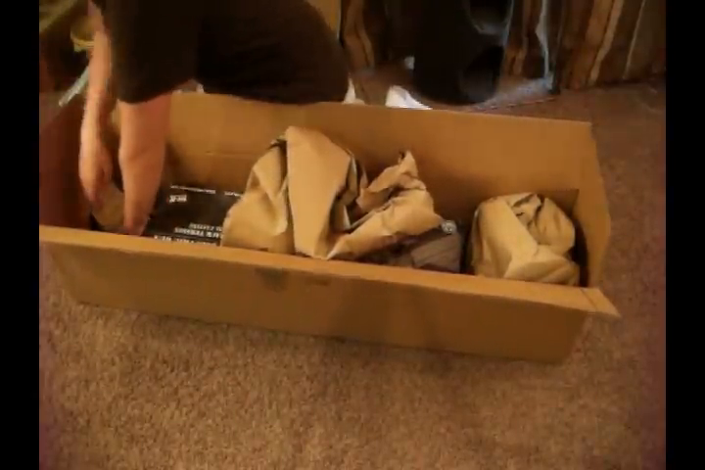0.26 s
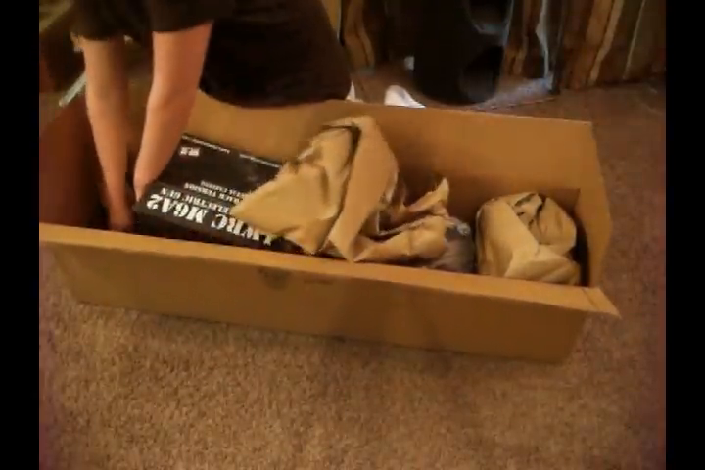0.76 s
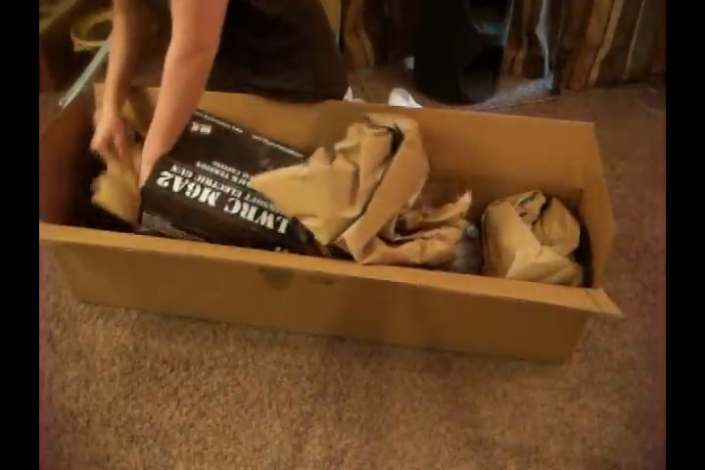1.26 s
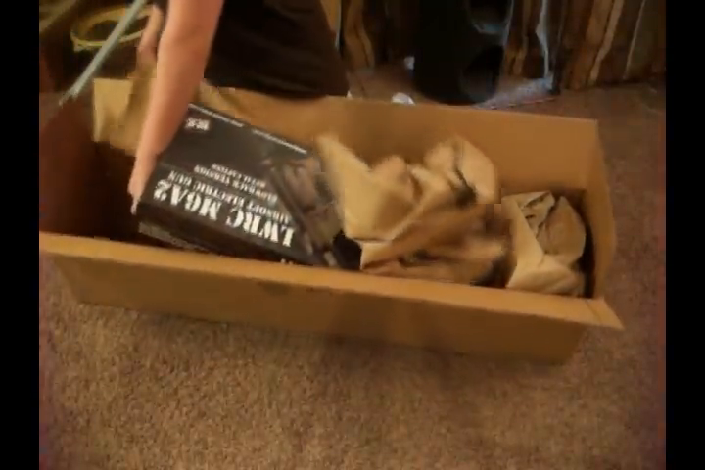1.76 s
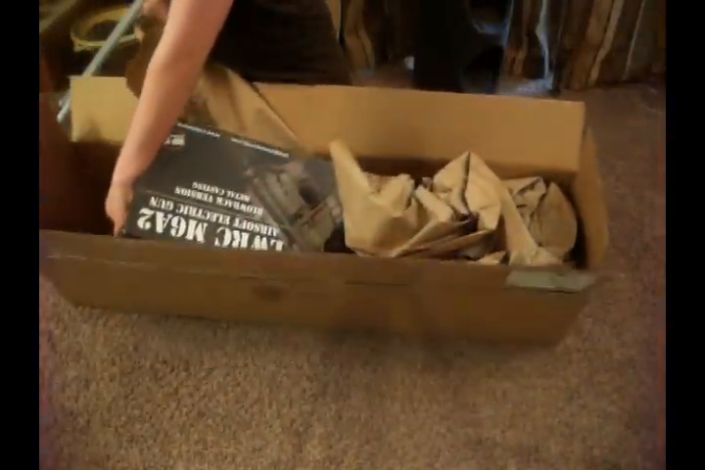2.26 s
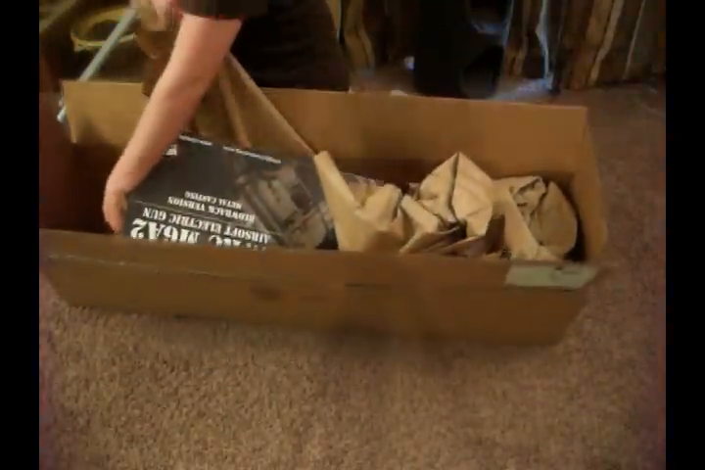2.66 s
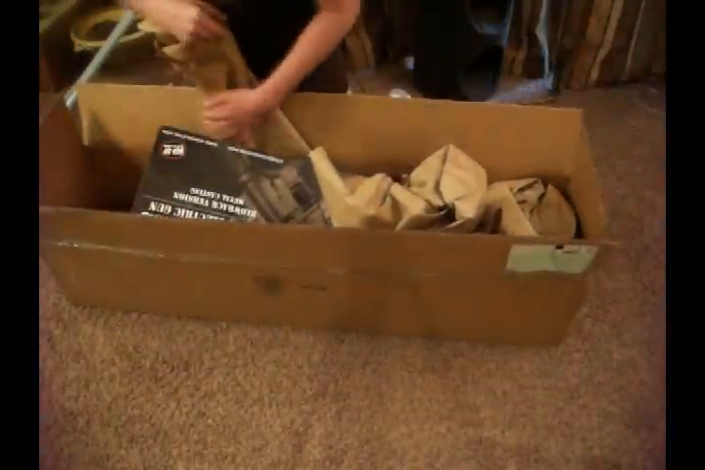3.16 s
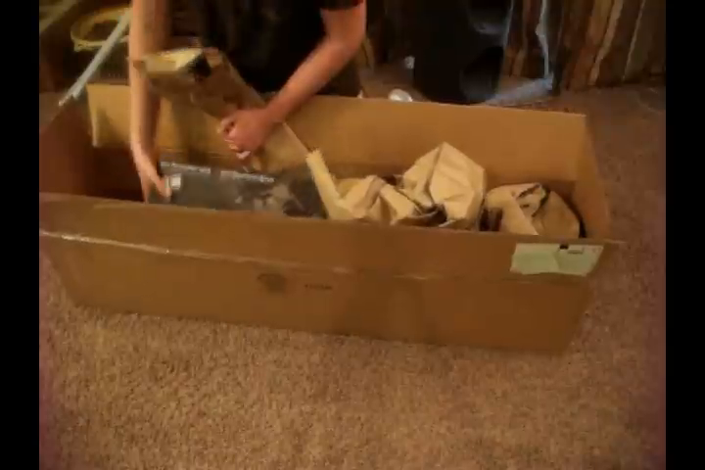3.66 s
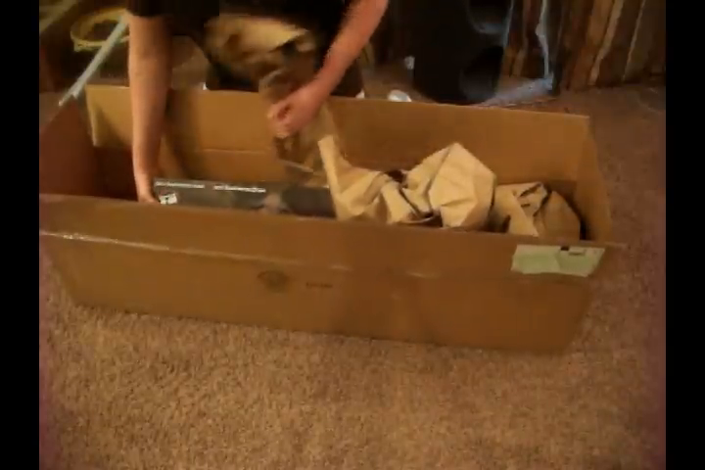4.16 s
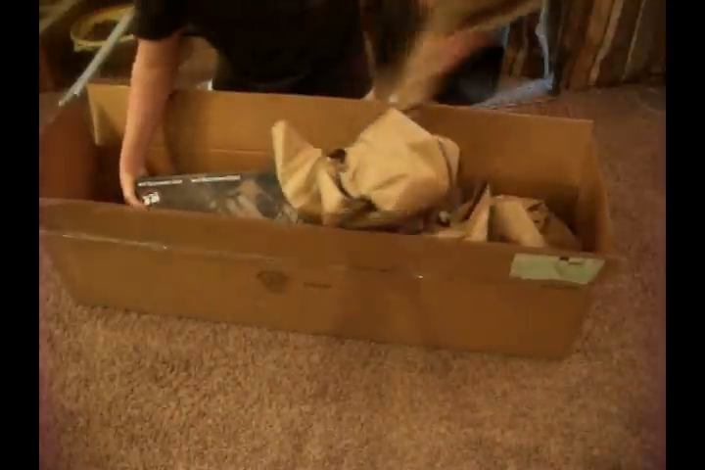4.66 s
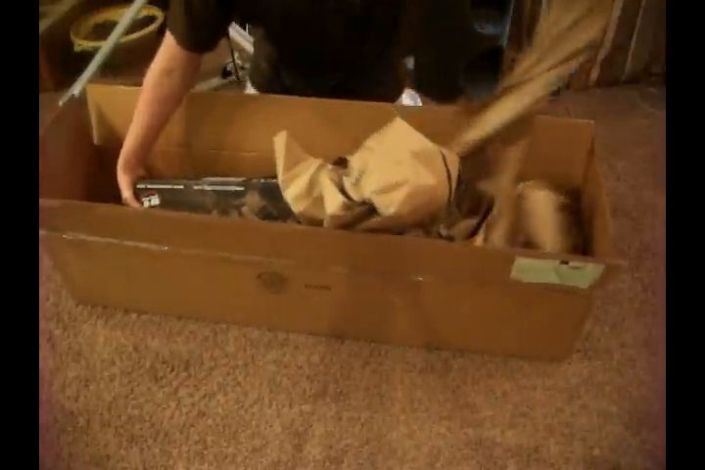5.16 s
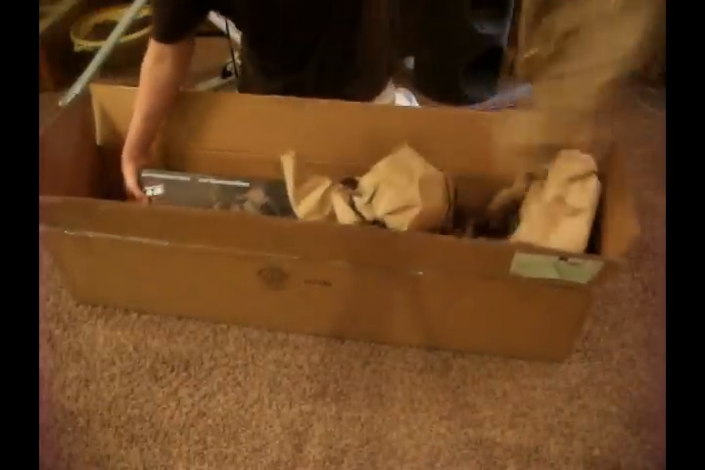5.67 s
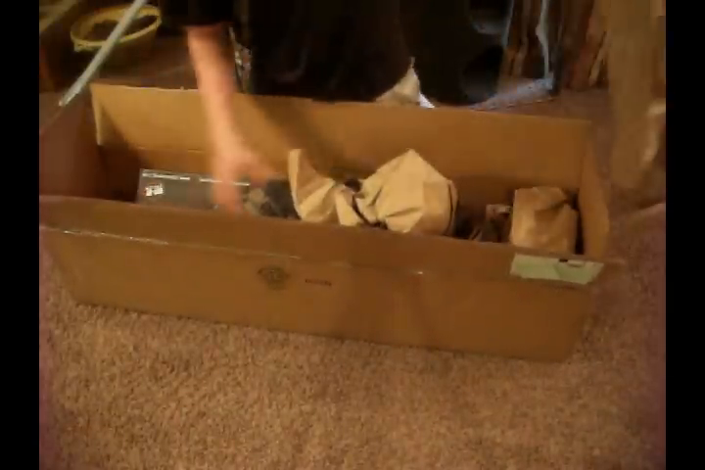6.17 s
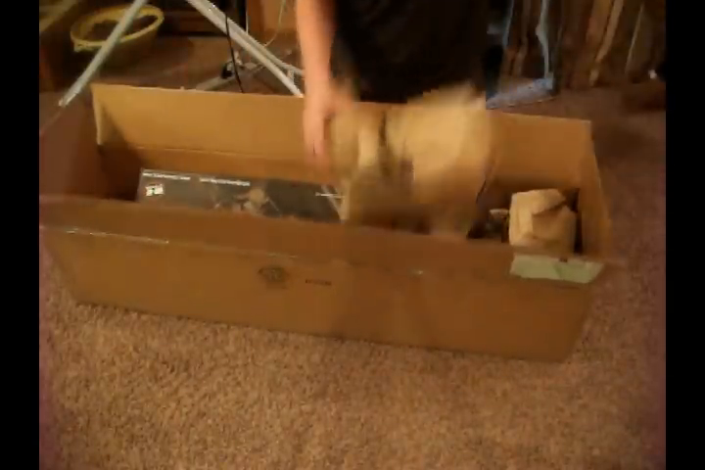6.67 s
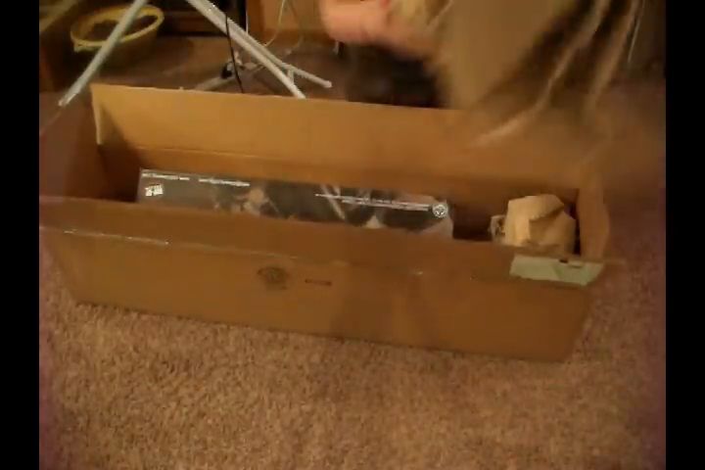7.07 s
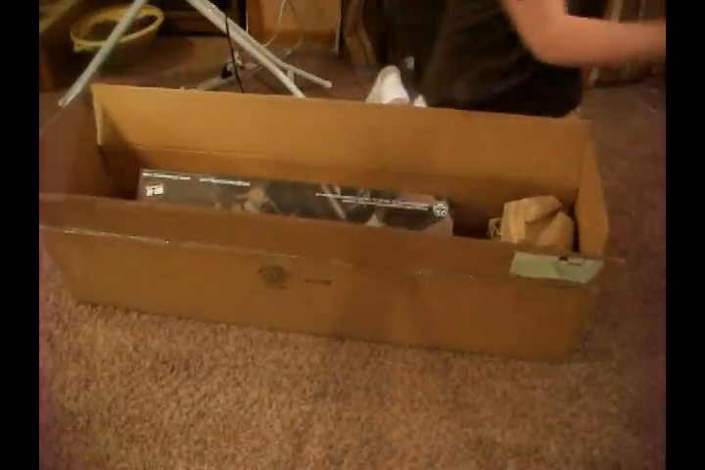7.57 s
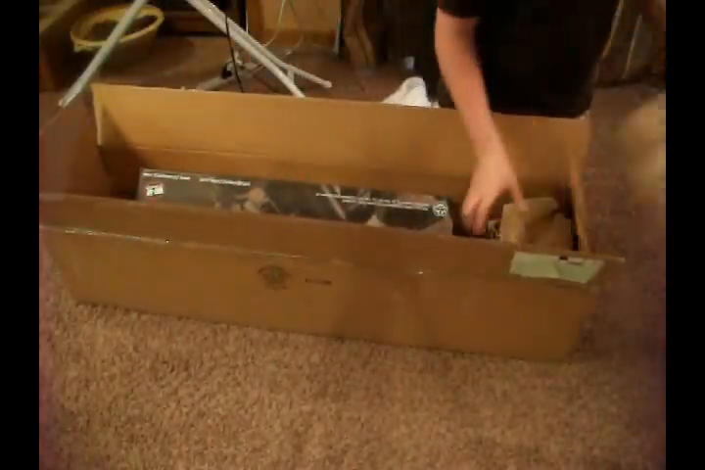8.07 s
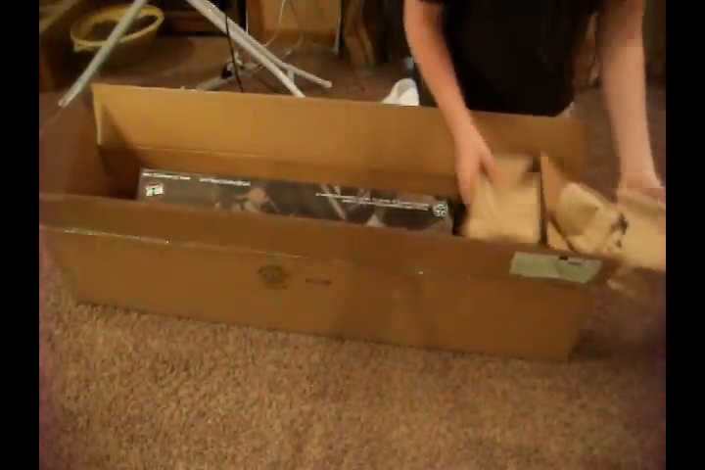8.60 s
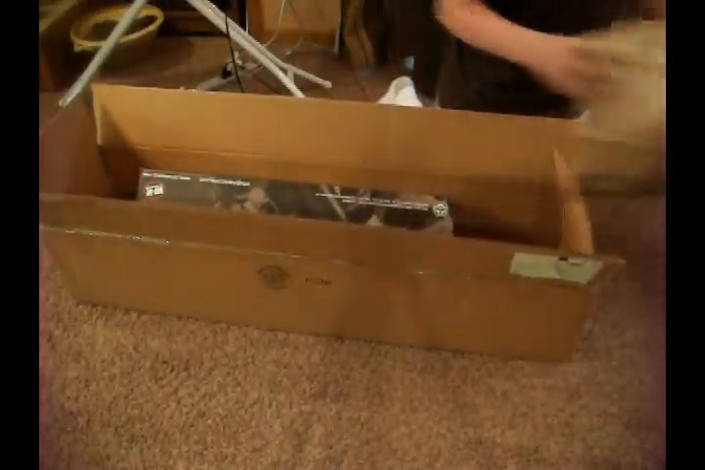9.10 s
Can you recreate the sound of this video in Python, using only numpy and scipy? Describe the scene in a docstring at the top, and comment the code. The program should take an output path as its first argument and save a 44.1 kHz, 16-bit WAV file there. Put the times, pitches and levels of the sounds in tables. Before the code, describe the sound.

A close microphone in a quiet carpeted room, with faint steady hiss and slightly dulled treble. From 0 to 1 s, light rustles and isolated crease snaps, with soft bumps on a cardboard carton. From 1 to 2.5 s the crumpled paper crinkles densely, big folds popping around 1.8 s. Smaller uneven tugs and dry snaps follow to 4 s, with hollow knocks near 3.5 and 3.8 s. From 4.2 to 6 s a long continuous crackling haul scrapes along the box, a cluster of dull thumps at about 5.7 s. A brief lull, then a second wad rustles and slides from 6.3 to 7.1 s, a fold popping at 7.3 s. After near quiet, a firm burst at 7.6 s, a carton bump and coarse crinkling at 8 s, then more snaps and pops until about 9.3 s.

```python
"""Packing paper dragged from a carton

Crumpled kraft packing paper is dragged out of a long cardboard box in a carpeted room, heard from close by.
Filtered noise makes the hiss of sliding sheets; short struck resonances make creases snap and big folds flap and pop.
Noise and knocks through resonant modes make the carton drone and bump; faint shaped noise is the still room.
The hand reaches in, works a sheet loose, hauls it along the box, lifts a second wad and takes out the last."""
import sys
import numpy as np
from scipy import signal
from scipy.fft import rfft, irfft, next_fast_len
from scipy.io import wavfile

SR = 44100
rng = np.random.default_rng(int(sys.argv[2]) if len(sys.argv) > 2 else 0)


def log_audio(samples):
    """Write samples as a 16-bit WAV file to the path given in sys.argv[1]."""
    # one column per channel
    frames = np.atleast_2d(samples).T
    # limit to full scale, then quantise
    limited = np.clip(frames, -1, 1)
    pcm = np.round(limited * 32767).astype(np.int16)
    wavfile.write(sys.argv[1], SR, pcm)


N = 411843
T = np.arange(N) / SR  # s

# Single creases that snap through. Each row: start in seconds, relative strength in dB,
# pitch of the ringing facet in Hz, length of the crease's run in seconds (0 = one dry tick).
CREASE_SNAPS = [(0.0694, -7.5, 4600, .003), (0.2682, -0.5, 3100, 0.000059), (0.2957, -.5, 4750, 0.00083),
                (.727, -2.5, 2500, 0.0096), (0.899, -6, 4400, .003), (0.943, -1.5, 2820, .006),
                (1.146, -4.5, 4200, .004), (1.162, 0, 2300, .003), (1.2256, 0, 3160, .003),
                (1.239, -2, 3600, .004), (1.3059, 2.5, 4170, .003), (1.351, 0.5, 2670, .005),
                (1.408, 0, 3300, 0.00024), (1.955, -6, 3600, 0), (1.972, -3, 3150, 0), (2.0705, 4, 3460, 0),
                (2.258, -3, 5300, 0), (2.2682, 0.5, 3300, 0.00084), (2.2989, -4, 4350, 0),
                (2.4891, -4, 3800, 0.0025), (2.5153, -5.5, 4500, .003), (2.682, -2, 2060, 0.0014),
                (2.7407, -2, 3620, 0.00037), (2.8164, -5, 3980, 0.0047), (2.9596, -0.5, 3620, .005),
                (3.0793, -5, 3220, .003), (3.1034, -2.5, 3970, .0015), (3.215, 2, 3320, 0.00041),
                (3.2707, -2.5, 3700, 0.0037), (3.3197, -2, 2330, 0), (3.3515, -3, 3100, 0.003),
                (3.3722, -1.5, 3900, .003), (3.389, -6, 2900, .003), (3.4295, 2.5, 4600, 0),
                (3.4662, 0, 2100, 0), (3.5343, -5, 2500, 0.0013), (3.546, -8, 2800, .002),
                (3.6222, 5, 3750, 0.00057), (3.6785, 1.5, 4400, 0), (3.7053, -11, 2420, .0004),
                (3.85, -3.5, 3170, .0033), (3.9668, 3, 4630, 0), (3.975, -1.5, 3650, 0.0031),
                (3.9966, 1.5, 3830, 0.0044), (4.0806, 2.5, 3700, 0.0012), (4.14, -7, 2200, .002),
                (4.241, -1.5, 3880, 0.00053), (4.2984, 5, 3880, 0), (4.379, 0, 4000, 0),
                (4.8357, 0, 2890, 0), (4.8977, 0.5, 3010, 0.002), (5.0618, 0, 3400, 0.00021),
                (5.4046, -2, 2800, 0.0045), (5.5637, 2.5, 4730, 0), (5.701, -9, 3800, 0.0037),
                (5.912, -1, 2230, 0.0086), (6.342, -15, 4440, .0034), (6.483, -2, 2920, 0.0098),
                (6.495, -9, 2600, 0.014), (6.506, -2, 2240, 0.00019), (6.5546, -5, 3490, .003),
                (6.606, -1.5, 2820, .004), (6.6475, -5, 3270, .006), (6.945, -7, 4160, 0.0017),
                (7.035, -10, 4600, 0.035), (7.2211, 5, 3850, 0.00021), (7.579, -17, 1500, 0.007),
                (7.695, 3, 2540, 0), (7.8354, 1.5, 3450, 0), (8.0275, -1.5, 2350, 0.01),
                (8.193, -2.5, 2500, 0.0034), (8.3, -2.5, 3960, 0.0027), (8.354, -3, 3000, .003),
                (8.4316, -1, 2820, 0.00043), (8.709, -2.5, 4000, .0032), (8.744, 1, 3700, 0),
                (8.804, -0.5, 3370, 0.0014), (8.8162, -1, 4300, .0005), (9.1018, 0, 4200, .004),
                (9.188, -4.5, 2260, .003), (9.2646, 2, 4600, 0.00016)]
# Tone of a snapping crease or popping fold. Each row: frequency in Hz, gain in dB.
SNAP_TONE = [(150, -16.5), (700, 0.5), (4500, -2.5), (5500, -5.5), (7000, -12.5), (8200, -35), (11000, -60)]

REST_HZ = 2660  # centre of the crinkle of slack paper
FULL_RUN_S = 0.0023  # a crease running this long has full after-snaps and shakes the sheet fully


def undb(db):
    """Decibels are logarithmic: return the amplitude gain."""
    return 10 ** (np.asarray(db) / 20)


def unit(x):
    """Normalise the mean power: scale to an rms of 1."""
    return x / np.sqrt(np.mean(x ** 2))


def curves(table):
    """Linear interpolation: each column after the first becomes a line through time."""
    s, *columns = np.transpose(table)
    return [np.interp(T, s, c) for c in columns]


def fade(t, t60):
    """Exponential decay of amplitude, 60 dB down at t60."""
    return np.exp(-np.log(1000) * t / t60)


def resonance(f, hz, width):
    """Complex response of one damped mode, 1 at its centre."""
    return 1j * f * width / (hz ** 2 - f ** 2 + 1j * f * width)


def colour(x, points, size=2048):
    """Minimum-phase filtering through (Hz, dB) points, its phase found by folding the cepstrum."""
    hz, db = np.transpose(points)
    f = np.maximum(np.fft.rfftfreq(size, 1 / SR), 1)
    log_gain = np.log(undb(np.interp(np.log(f), np.log(hz), db)))
    cepstrum = irfft(log_gain)
    cepstrum[1:size // 2] *= 2
    cepstrum[size // 2 + 1:] = 0
    response = irfft(np.exp(rfft(cepstrum)))
    return signal.oaconvolve(x, response)[:N]


def band(x, hz, kind, order=2):
    """Butterworth filtering: low-, high- or band-pass."""
    return signal.sosfilt(signal.butter(order, hz, kind, fs=SR, output="sos"), x)


def walk(rate):
    """Slow random fluctuation with a spread near 1: straight lines join chance values, rate per second."""
    knots = rng.standard_normal(4096)
    return 1.2 * np.interp(T * rate, np.arange(len(knots)), knots)


def place(times, sounds):
    """Superposition: add each row of sounds at its time."""
    at = (np.maximum(times, 0) * SR).astype(int)[:, None] + np.arange(sounds.shape[1])
    return np.bincount(at.ravel(), sounds.ravel(), N)[:N]


def run_share(run_s):
    """A longer run disturbs more paper: amplitude grows as the square root of run length, up to 1."""
    return np.clip(run_s / FULL_RUN_S, 0, 1) ** 0.5


def tug(t, length):
    """Envelope of a pull: quick onset, slight swell while held, exponential settling on release."""
    attack_s, swell_db_per_s, release_t60_s = 0.012, 0.83, 0.37
    held = undb(swell_db_per_s * np.clip(t, 0, length))
    onset = np.clip(t / attack_s, 0, 1)
    return onset * held * fade(np.maximum(t - length, 0), release_t60_s)


def handling():
    """Incoherent moves add in power; rows of (s, crinkle dB, folds dB, drag dB, centre Hz)."""
    # Grabs and pulls. Each row: start in seconds, length in seconds, relative levels in dB of crinkle,
    # flapping folds and drag on the carton, centre of the crinkle in Hz.
    pulls = [ (-.01, 0.011, -28, -30.5, -25.5, 2760), (0.056, 0.038, -27, -26.5, -31, 3920),
             (0.196, 0.035, -31, -47, -31.5, 2980), (0.251, 0.082, -28.5, -34, -33, 3000),
             (0.521, 0.053, -35, -33, -33, 2800), (0.705, 0.016, -22, -26, -26.5, 2520),
             (0.751, 0.038, -26, -28, -27, 2520), (0.85, 0.099, -29, -33, -40, 2530),
             (0.956, 0.037, -17, -36, -27.5, 2420), (1.009, 0.064, -28, -27, -28.5, 2530),
             (1.072, 0.068, -18.5, -24.5, -25, 2570), (1.177, 0.19, -22.5, -29.5, -28, 2370),
             (1.361, 0.17, -19, -25.5, -25.5, 2530), (1.567, .425, -19.5, -24.5, -29.5, 3060),
             (2.015, 0.23, -21.5, -27, -30, 2600), (2.26, 0.12, -20, -25, -25.5, 2600),
             (2.395, 0.11, -23, -28.5, -31, 2600), (2.547, 0.12, -28.5, -28.5, -28.5, 2600),
             (2.651, 0.05, -20.5, -37, -29, 2420), (2.705, 0.086, -22, -26.5, -30, 2460),
             (2.825, 0.054, -31.5, -30.5, -31.5, 2500), (2.965, 0.082, -31, -35, -41, 2700),
             (3.071, 0.039, -28, -27, -31.5, 2770), (3.177, 0.11, -23.5, -29.5, -40, 2770),
             (3.303, 0.014, -23.5, -25.5, -27.5, 2500), (3.377, 0.23, -21, -29, -29.5, 2540),
             (3.625, 0.26, -23, -29.5, -32, 2640), (3.928, 0.021, -24, -32, -32, 2820),
             (4.011, 0.2, -19.5, -31.5, -32, 2780), (4.216, 1, -19.5, -26.5, -31.5, 3110),
             (5.228, 0.423, -19, -24, -28.5, 3030), (5.664, 0.14, -19.5, -27, -25, 2630),
             (5.819, 0.044, -18.5, -24, -30.5, 2610), (5.904, 0.084, -24, -28, -31, 2550),
             (6.366, 0.087, -23, -28.5, -33, 3070), (6.49, 0.055, -21.5, -25.5, -31, 2720),
             (6.587, 0.082, -24, -28.5, -40, 2780), (6.709, 0.15, -24.5, -28.5, -34, 3000),
             (6.928, 0.034, -26, -32.5, -35, 3500), (7.111, .13, -36, -33.5, -43, 3200),
             (7.567, 0.09, -24.5, -31.5, -38, 2690), (7.666, 0.2, -18, -22.5, -31.5, 2550),
             (7.952, 0.021, -19.5, -27, -24, 2380), (8.016, 0.11, -20.5, -23, -28, 2240),
             (8.179, 0.11, -19.5, -23.5, -31.5, 2460), (8.321, 0.074, -23, -25.5, -30, 2380),
             (8.709, 0.16, -21, -29, -34, 2300), (8.963, 0.03, -25, -29.5, -34, 2200),
             (9.034, 0.19, -29, -37.5, -56, 2250), (9.176, 0.13, -21.5, -26.5, -37, 2280)]
    # Sheet gliding lightly over sheet. Each row: fastest moment in seconds, half-length in seconds,
    # relative level in dB, centre of the hiss in Hz.
    glides = [(0.392, 0.088, -33.5, 3000), (0.56, 0.069, -25.5, 3230), (0.686, 0.017, -25, 2700),
              (6.151, 0.04, -27.5, 2660), (6.767, 0.044, -20.5, 2960), (6.941, 0.0088, -21.5, 3920),
              (7.018, .05, -34, 3600), (7.436, 0.59, -40.5, 2770), (8.493, 0.051, -27.5, 2790),
              (8.692, 0.12, -25, 3420)]
    rest_db = (-59.5, -50.5, -62.5)  # slack paper settling between moves: crinkle, folds, drag
    glide_db = np.array([0, -19.5, -26.5])  # the same three, relative to the hiss
    # a snapped crease shakes the sheet around it: crinkle relative to the snap, then folds and drag to that
    shake_db, shake_t60_s = -18.5 + np.array([0, -7.5, -21.5]), 0.1

    t = T[::64]
    moves = [(np.ones(len(t)), rest_db, REST_HZ)]
    for s, length, *levels, hz in pulls:
        moves.append((tug(t - s, length), levels, hz))
    for s, half, db, hz in glides:
        swell = np.exp(-0.5 * ((t - s) / half) ** 2)
        moves.append((swell, db + glide_db, hz))
    for s, db, hz, run_s in CREASE_SNAPS:
        shake = (t > s) * fade(np.abs(t - s), shake_t60_s) * run_share(run_s)
        moves.append((shake, db + shake_db, np.sqrt(hz * REST_HZ)))

    power = np.array([np.outer(undb(levels), shape) ** 2 for shape, levels, _ in moves])
    total = power.sum(axis=0)
    # the move with the most crinkle power weighs most in the centre
    centre_hz = np.array([hz for *_, hz in moves]) @ power[:, 0] / total[0]
    return np.column_stack([t, *(10 * np.log10(total)), centre_hz])


def still_room():
    """Stationary noise with a falling spectrum: the still room and microphone hiss."""
    # Each row: frequency in Hz, relative level in dB.
    hiss_tone = [(20, 3), (60, -11), (120, -7.5), (300, -7), (1000, -12.5), (4000, -19.5), (6000, -31.5),
                 (8500, -48.5)]
    return unit(colour(rng.standard_normal(N), hiss_tone)) * undb(-37.5)


def room(x, t60, wet_db, echo, count=26, size=14000):
    """Early reflection and reverberation: shifting sheets make carton echoes and room tail vary."""
    t = np.arange(size) / SR
    nearness = np.exp(5.0 * np.array([walk(16) for _ in range(count)]))
    out = x
    # each spot has its own response, and the spots' weights keep changing
    for weight in nearness / np.linalg.norm(nearness, axis=0):
        tail = rng.standard_normal(size) * fade(t, t60) * (1 - np.exp(-t / 0.0011))
        response = undb(wet_db) * tail / np.linalg.norm(tail)
        # two nearby carton walls answer within 2 to 14 ms, with opposite signs
        response[rng.integers(SR // 500, SR // 70, 2)] += echo * np.array([1, -1])
        out = out + signal.oaconvolve(x * weight, response)[:N]
    return out / np.sqrt(1 + undb(wet_db) ** 2 + 2 * echo ** 2)


def ring(x):
    """Modal superposition: a push excites the air and wall resonances of the carton."""
    # Each row: frequency in Hz, width in Hz, gain in dB.
    carton_modes = [(77, 8.9, -5), (147.3, 34, -1.5), (196, 21.6, 4.5), (257, 43, -1.5), (306.3, 18, 0.5),
                    (352, 24, -2), (451, 76, -5)]
    size = next_fast_len(N + SR)
    f = np.fft.rfftfreq(size, 1 / SR)
    body = sum(undb(db) * resonance(f, hz, width) for hz, width, db in carton_modes)
    return irfft(rfft(x, size) * body, size)[:N]


def carton(drag_db):
    """Forced vibration: paper scraping along the cardboard keeps the carton's modes droning."""
    scrape = rng.standard_normal(N) * undb(1.0 * walk(35))
    drone = band(ring(scrape), 480, "low")
    # the long walls also sway slowly as they are pushed
    sway = unit(band(rng.standard_normal(N), [38, 80], "band")) * undb(0.25 * drag_db - 39.0)
    return unit(drone) * undb(drag_db - 0.5) + sway


def bumps(size=16384):
    """Impulsive excitation: knocks on the carton, and one hollow fold pop, flex, shudder and ring."""
    # Each row: start in seconds, relative strength in dB, pitch of the panel or fold in Hz,
    # t60 of the shudder in seconds.
    thumps = [(.053, -11, 133, .083), (.057, -13, 60, .16), (0.095, -11.5, 670, 0.16),
              (0.53, -20, 134, 0.12), (2.322, -14, 212, 0.15), (2.523, -12, 179, 0.26),
              (2.524, -23, 70, 0.21), (3.516, -16, 73, 0.14), (3.518, -5.5, 603, .052),
              (3.785, -5.5, 178, 0.16), (3.785, -14, 300, 0.051), (3.844, -11.5, 172, 0.38),
              (3.846, -14, 74, 0.22), (3.846, -11.5, 322, 0.2), (5.666, -8, 360, 0.11),
              (5.679, -5, 430, 0.06), (5.683, -5, 177, 0.17), (5.684, -12, 70, 0.4),
              (5.749, -7.5, 120, 0.082), (5.765, -7, 153, 0.035), (7.269, -13, 880, 0.19),
              (7.952, -7.5, 433, 0.11), (7.959, -7, 229, 0.1), (7.966, -13, 64, .14)]
    s, db, hz, t60 = (c[:, None] for c in np.transpose(thumps))
    t, f = np.arange(size) / SR, np.fft.rfftfreq(size, 1 / SR)
    flex = np.sin(2 * np.pi * hz * t) * fade(t * hz, 8.2)  # 60 dB down after 8.2 cycles
    noise = rng.standard_normal((len(s), size))
    shudder = irfft(rfft(noise) * resonance(f, hz, 0.84 * hz) ** 2)
    shudder *= fade(t, t60) * (1 - np.exp(-t / 0.003)) / shudder.std(axis=1, keepdims=True)
    struck = band(place(s[:, 0], (0.57 * flex + 0.3 * shudder) * undb(db)), 45, "high")
    return struck + undb(-10) * ring(struck)


def rubs():
    """Sustained narrow resonance: a taut edge rubs and sings faintly."""
    # Each row: firmest moment in seconds, half-length in seconds, relative level in dB, pitch in Hz.
    singing_edges = [(4.35, .16, -35, 1810), (8.48, .06, -34, 2060)]
    out = np.zeros(N)
    for s, half, db, hz in singing_edges:
        tone = unit(band(rng.standard_normal(N), [hz - 35, hz + 35], "band"))
        out += tone * np.exp(-0.5 * ((T - s) / half) ** 2) * undb(db)
    return out


def facets(hz, rise, t60, size=1024):
    """Damped free oscillation: a patch of paper flips over and swings at its pitch; all equal in energy."""
    t = np.arange(size) / SR
    swing = np.sin(2 * np.pi * hz[:, None] * t) * (1 - np.exp(-t / rise)) * fade(t, t60)
    return swing / np.linalg.norm(swing, axis=1, keepdims=True)


def creases(hz, t60, width, crack, size=384):
    """Impulse response of a small facet: a sudden kink and dying crack ring it; all equal in energy."""
    t, f, hz = np.arange(size) / SR, np.fft.rfftfreq(size, 1 / SR), hz[:, None]
    burst = rng.standard_normal((len(hz), size)) * fade(t, t60)
    burst[:, 0] += 3.2 * np.sign(burst[:, 0])
    response = resonance(f, hz, width * hz) + crack * resonance(f, 3740, 11000)
    snap = irfft(rfft(burst) * response)
    return snap / np.linalg.norm(snap, axis=1, keepdims=True)


def pops():
    """Snap-through of a large shell: a big fold pops with a hollow knock and paper around it flutters."""
    # Each row: start in seconds, relative strength in dB, pitch of the fold in Hz.
    popping_folds = [(1.0895, -7, 1600), (1.8073, 1, 1540), (1.8368, 1.5, 1070), (2.446, 0.5, 1300),
                     (2.5153, -0.5, 1080), (3.313, -2, 850), (3.3728, -8, 1100), (3.7631, -4.5, 1370),
                     (6.4822, -2.5, 1425), (6.598, -10, 1100), (7.2665, -3, 935), (8.026, -2, 1260),
                     (8.3534, -1, 1290), (8.742, 3, 1770), (8.9734, -4, 1660)]
    s, db, hz = np.transpose(popping_folds)
    knock = facets(hz, rise=0.0004, t60=0.015)
    flutter = creases(hz, t60=0.03, width=0.5, crack=0.17, size=1024)
    return colour(place(s, (knock + flutter) * undb(db + 6.0)[:, None]), SNAP_TONE)


def snaps():
    """Buckling instability: a stiff crease cracks and rings its facet; a running one adds later cracks."""
    s, db, hz, run_s = np.transpose(CREASE_SNAPS)
    crack = creases(hz, t60=0.009, width=0.9, crack=0.8)
    swing = facets(hz, rise=0.00024, t60=0.008)
    out = place(s, swing * undb(db + 6.0)[:, None])
    out += place(s, crack * undb(db + 3.0)[:, None])
    # up to four after-snaps along the run, weaker the later they come
    for lag in np.sort(rng.random((4, len(s))), axis=0):
        later = creases(np.sqrt(hz * REST_HZ), t60=0.009, width=0.6, crack=0.6)
        gain = run_share(run_s) * undb(db + 8.5 - 4.8 * lag)
        out += place(s + run_s * lag, later * gain[:, None])
    return colour(out, SNAP_TONE)


def crackle(lo_hz, hi_hz, t60, spread_db, count):
    """Random point process of creases: sizes vary by spread_db, from nearly equal to moderately uneven."""
    when, pitch, strength = rng.random((count, 3)).T
    size = undb(spread_db * np.minimum(-np.log(1 - strength), 3.6))
    ticks = creases(lo_hz * (hi_hz / lo_hz) ** pitch, t60, width=0.25, crack=0.85)
    return place(when * N / SR, ticks * size[:, None])


def folds(fold_db):
    """Larger patches have lower modes: big folds flap below the pitch of the small creases."""
    flaps = crackle(543, 1190, t60=0.0044, spread_db=0.5, count=7000)
    return unit(band(flaps, [380, 1500], "band")) * undb(fold_db - 1.0)


def flurries(t60, depth, count=420):
    """Avalanche of buckling: one facet sets off its neighbours, so ticks flare up and die away."""
    when, strength = rng.random((count, 2)).T
    flares = strength[:, None] ** 2 * fade(T[:2048], t60)
    return 1 + depth * place(when * N / SR, flares)


def flexing(x, depth_db, rate, count=14):
    """Time-varying spectrum: as the sheet bends, facets of each size come and go in overlapping bands."""
    size = next_fast_len(N)
    spectrum = rfft(x, size)
    f = np.fft.rfftfreq(size, 1 / SR)
    where = np.interp(np.log1p(f), np.log([600, 7500]), [0, count - 1])
    out = np.zeros(N)
    for k in range(count):
        part = irfft(spectrum * np.maximum(1 - np.abs(where - k), 0), size)[:N]
        out += part * undb(depth_db * walk(rate))
    return unit(out)


def crinkle(effort_db, centre_hz):
    """Friction and buckling: sheets slide with a hiss; under force facets buckle and stiff ridges click."""
    # Tone of the paper. Each row: frequency in Hz, gain in dB.
    paper_tone = [(180, -42.5), (300, 0), (414, -15), (456, -5.5), (694, -5.5), (856, 0.5), (3980, -1),
                  (4700, -2.5), (5450, -10), (6350, -14), (7360, -20), (8460, -32), (11000, -63.5)]
    ticks = crackle(1400, 7000, t60=0.01, spread_db=2.0, count=9000)
    ticks = unit(ticks * flurries(t60=0.024, depth=2.2))
    ridges = unit(crackle(1300, 7000, t60=0.012, spread_db=0.3, count=480)) * undb(-3.5)
    slide = unit(band(rng.standard_normal(N), 11000, "low")) * undb(0.5 * walk(30))
    # gentle handling mostly slides the paper, firm handling buckles it
    buckling = np.clip(0.68 / (1 + np.exp(-(effort_db + 30.0) / 3.0)), 0, 1)
    rustle = np.sqrt(buckling) * unit(ticks + ridges) + np.sqrt(1 - buckling) * slide
    sheet = flexing(band(colour(rustle, paper_tone), 1090, "high"), depth_db=1.0, rate=40)
    # a taut, crisp sheet speaks higher than a slack one
    dull = signal.sosfiltfilt(signal.butter(2, 3000, fs=SR, output="sos"), sheet)
    tilt = (centre_hz / 2750) ** 1.23 * undb(0.5 * walk(30))
    return (dull / tilt + (sheet - dull) * tilt) * undb(effort_db + 0.13)


def scene():
    """Superposition of sources: reverberant paper, with carton, bumps and still room added dry."""
    effort_db, fold_db, drag_db, centre_hz = curves(handling())
    paper = crinkle(effort_db, centre_hz) + folds(fold_db) + snaps() + pops() + rubs()
    paper_in_room = room(paper, t60=0.59, wet_db=-11.5, echo=0.14)
    return (paper_in_room + carton(drag_db) + bumps() + still_room())[None]


def record(dry):
    """Band limiting and soft saturation: the treble is dulled, high peaks rounded and the top cut."""
    dulled = band(dry, 7300, "low", order=6)
    rounded = dulled / (1 + (dulled / 0.8) ** 4) ** 0.25
    steep_cut = signal.ellip(10, 0.2, 75, 8400, fs=SR, output="sos")  # 8400 Hz edge
    return signal.sosfilt(steep_cut, rounded)


dry = scene()
out = record(dry)
log_audio(out)
```